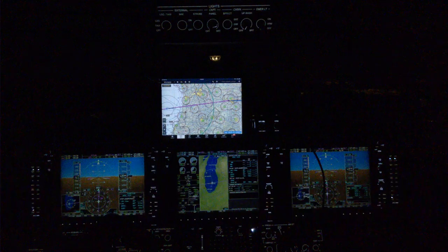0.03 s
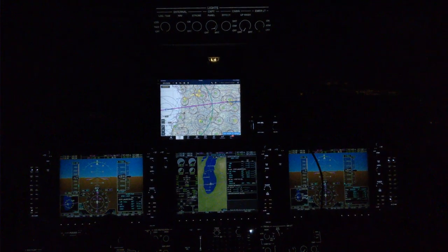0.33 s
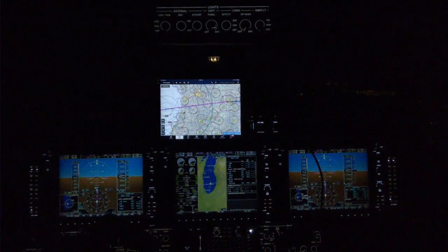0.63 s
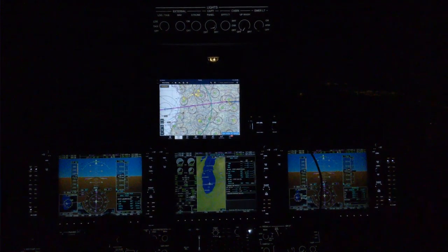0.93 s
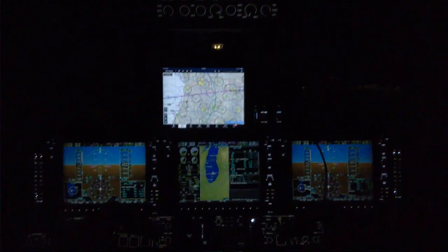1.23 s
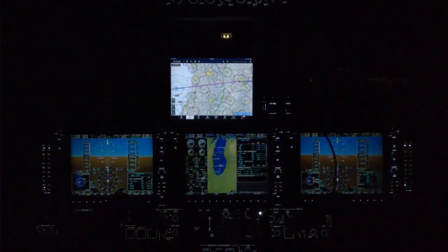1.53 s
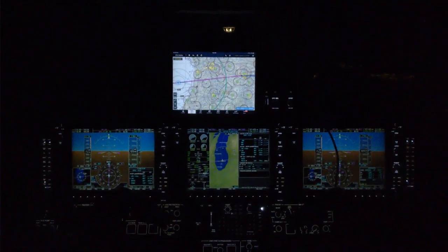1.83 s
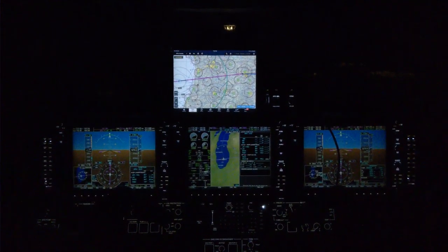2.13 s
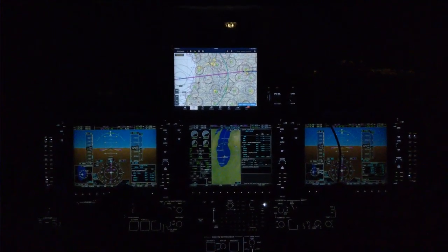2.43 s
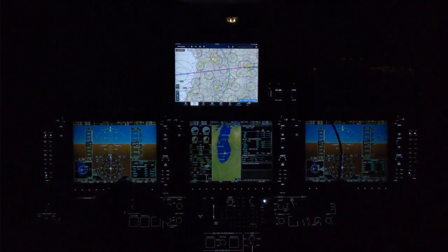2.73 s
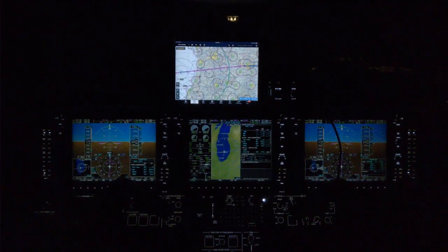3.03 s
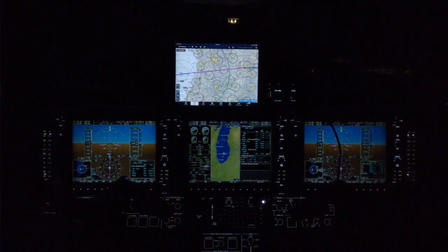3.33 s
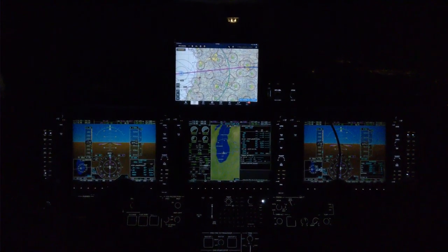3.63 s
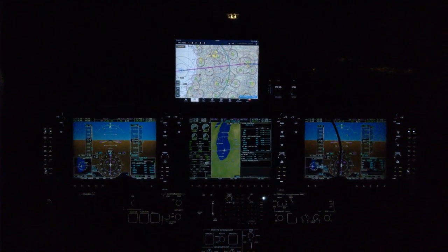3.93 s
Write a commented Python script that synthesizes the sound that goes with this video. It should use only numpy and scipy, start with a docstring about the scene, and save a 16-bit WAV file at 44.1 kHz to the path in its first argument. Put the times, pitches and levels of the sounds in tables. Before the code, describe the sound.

Steady aircraft cockpit noise in flight: deep rumble, rushing air and a low engine drone.

```python
"""The deep rumble of an aircraft's body, heard in the cockpit in steady cruise at night.
Outside air rushes along the windscreen on both sides, and the engines drone on one low note.
Behind it all, a jet of air from a vent hisses softly on the right.
The sound fades in from silence at the start."""
import sys
import numpy as np
from scipy.fft import rfft, irfft, next_fast_len
from scipy.io import wavfile
from scipy.ndimage import map_coordinates

SR = 44100
rng = np.random.default_rng(int(sys.argv[2]) if len(sys.argv) > 2 else 0)


def unload_wav(signal):
    """Save mono or channel-first audio to the path in sys.argv[1] as 16-bit WAV at rate SR, clipped to [-1, 1]."""
    wavfile.write(
        sys.argv[1],
        SR,
        np.round(np.clip(np.atleast_2d(signal).T, -1, 1) * 32767).astype(np.int16),
    )


N = 176400


def amp(db):
    """Decibels to gain."""
    return 10 ** (np.asarray(db) / 20)


def unit(x):
    """Scale to rms 1."""
    return x / np.sqrt(np.mean(x ** 2) + 1e-20)


def along(points, hz):
    """Read (Hz, value) points on a log axis."""
    f, v = np.transpose(points)
    return np.interp(np.log(hz + 1), np.log(f + 1), v)


def wobble(rate):
    """A smooth random curve, rate knots a second."""
    return map_coordinates(rng.standard_normal(512), [np.arange(N) * rate / SR], mode="mirror")


def pan(db):
    """Left and right gains for a level difference."""
    return amp(np.array([[.5], [-.5]]) * db)


def filtered(x, response):
    """x times a response of frequency."""
    m = next_fast_len(N + SR // 2)
    return irfft(rfft(x, m) * response(np.fft.rfftfreq(m, 1 / SR)), m)[..., :N]


def noise(spectrum, channels):
    """Unrelated noises of rms 1 with the given colour."""
    return unit(filtered(rng.standard_normal((channels, N)), lambda hz: amp(along(spectrum, hz))))


RUMBLE_DB, RUMBLE_SIDE_DB = -27, -20.5  # overall level; how much weaker the part the ears don't share is
# How strong the rumble is at each pitch (frequency [Hz], level [dB])
RUMBLE_COLOUR = [(15, -18), (28, -15), (33, -8), (46, -12), (55, -1), (64, -2), (78, 1), (98, -2),
                 (140, -4), (190, -3), (240, -11), (315, -10.5), (380, -22), (700, -44), (2000, -90)]
# How the rumble swells and dips (time [s], level change [dB])
RUMBLE_SWELLS = [(.42, -1.5), (.53, 3.5), (.66, -.8), (1.15, -0.1), (1.32, 1.5), (1.45, -2), (1.62, .8),
                 (1.77, 1), (1.86, -0.77), (2.3, -.3), (2.42, 0.5), (2.78, .3), (2.91, -1.8), (3.1, 1.5),
                 (3.7, -1), (3.95, 1)]

def airframe_rumble():
    """The aircraft's body shakes with a low rumble, nearly the same at both ears."""
    shared, side = noise(RUMBLE_COLOUR, channels=2) * amp([[0], [RUMBLE_SIDE_DB]])
    ears = np.array([shared + side, shared - side])
    swell_db = np.interp(np.arange(N) / SR, *np.transpose(RUMBLE_SWELLS))
    sway_db = 0.5 * wobble(rate=5)  # small random rises and falls
    return amp(RUMBLE_DB + swell_db + sway_db) * ears * pan(db=-0.7)


RUSH_DB = -28
# How strong the rushing air is at each pitch (frequency [Hz], level [dB])
RUSH_COLOUR = [(30, -12), (150, -4), (260, -4), (350, -.5), (460, -0.3), (515, 2.5), (600, -2.5),
               (690, -0.5), (780, 1), (850, -.5), (1010, -0.5), (1070, -2.5), (1150, -2), (1420, -4),
               (1780, -7), (2200, -8), (3200, -14), (4500, -18.5), (6000, -25), (8000, -30.5),
               (9200, -31.5), (10400, -31), (13000, -33), (15600, -36)]
# How alike it is at the two ears (frequency [Hz], likeness [1 = same, 0 = unrelated, -1 = opposite])
RUSH_LIKENESS = [(200, 0.82), (300, .75), (355, 0.4), (490, 0.9), (610, 0.68), (780, .78), (1020, .66),
                 (1200, .38), (1450, .32), (1750, 0.023), (2300, -.22), (3000, -0.051), (3800, 0.11),
                 (5200, -0.22), (7000, -.05), (12000, -0.13)]
# Which ear hears more of it (frequency [Hz], left minus right [dB])
RUSH_PAN = [(500, -1), (900, -0.5), (1400, 1.5), (1800, 1), (2300, 2), (3200, 0), (8000, 0), (14000, -1)]

def rushing_air():
    """Air swirls over the skin and windscreen: low sounds sit in the middle, high ones all around."""
    def shared_and_side_gains(hz):
        """The more alike the ears are at a pitch, the more of the noise they share."""
        angle = np.arccos(np.clip(along(RUSH_LIKENESS, hz), -1, 1)) / 2
        return np.array([np.cos(angle), np.sin(angle)])

    shared, side = filtered(noise(RUSH_COLOUR, channels=2), shared_and_side_gains)
    ears = np.array([shared + side, shared - side])
    ears = filtered(ears, lambda hz: pan(along(RUSH_PAN, hz)))
    sway_db = 0.32 * wobble(rate=6)
    return amp(RUSH_DB + sway_db) * unit(ears)


DRONE_HZ, DRONE_WANDER_HZ, DRONE_DB, DRONE_SWAY_DB = 183, 1.17, -35.5, 1

def engine_drone():
    """The spinning engine shafts hum one low note that wavers in pitch and loudness."""
    pitch_hz = DRONE_HZ + DRONE_WANDER_HZ * wobble(rate=5)
    sway_db = DRONE_SWAY_DB * wobble(rate=5)
    note = np.sin(2 * np.pi * np.cumsum(pitch_hz) / SR) * amp(sway_db)
    return amp(DRONE_DB) * unit(note) * pan(db=-2.5)  # a little to the right


VENT_DB = -51.5
# How strong the vent's hiss is at each pitch (frequency [Hz], level [dB])
VENT_COLOUR = [(500, -40), (2500, -8), (3400, -7), (3700, 0), (4000, -2.5), (5000, 0.5), (5700, 0.5),
               (6400, -2), (6800, -8), (9000, -18), (10400, -12.5), (15600, -28)]

def vent_hiss():
    """A steady jet of cabin air hisses out of a vent on the right."""
    return amp(VENT_DB) * noise(VENT_COLOUR, channels=2) * pan(db=-15)


def scene():
    """Everything heard from the pilots' seats."""
    return airframe_rumble() + rushing_air() + engine_drone() + vent_hiss()


TOP_HZ = 15700
# How the sound rises out of silence (time [s], level change [dB])
FADE_IN = [(.12, -85), (.16, -50), (.195, -35), (.23, -15), (.26, -8), (.31, -3.5), (.42, -1.5),
           (.65, -0.15), (1, 0.5)]

def record(dry):
    """Fade the sound in and cut away everything higher than TOP_HZ."""
    fade = amp(np.interp(np.arange(N) / SR, *np.transpose(FADE_IN)))
    return filtered(dry * fade, lambda hz: hz < TOP_HZ)


dry = scene()
out = record(dry)
unload_wav(out)
```